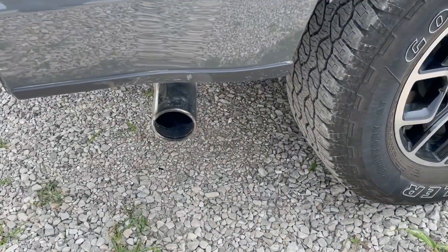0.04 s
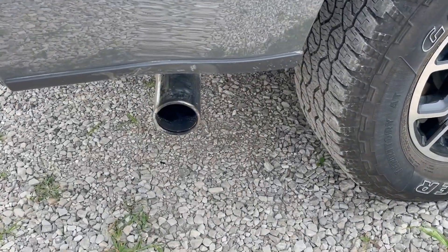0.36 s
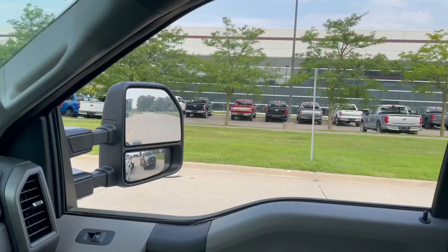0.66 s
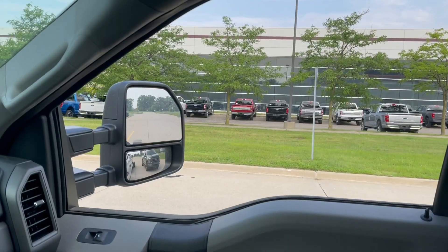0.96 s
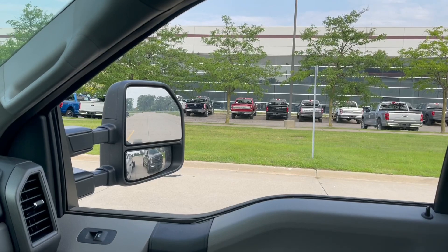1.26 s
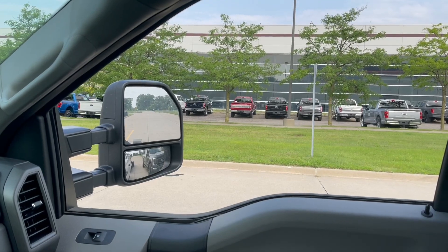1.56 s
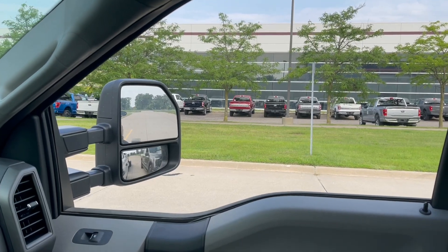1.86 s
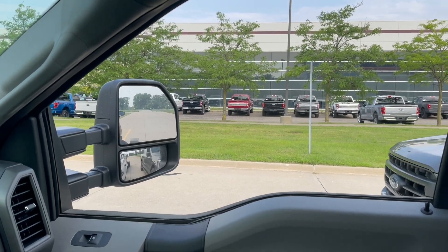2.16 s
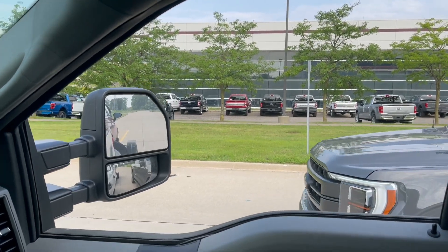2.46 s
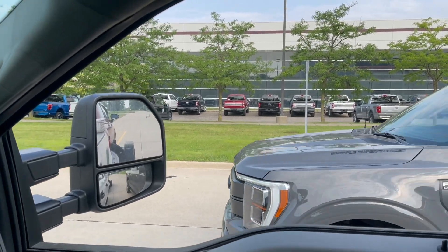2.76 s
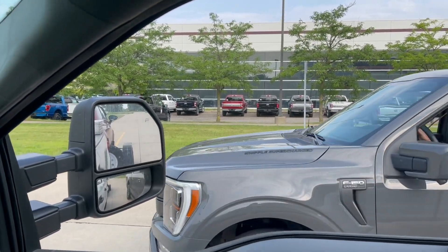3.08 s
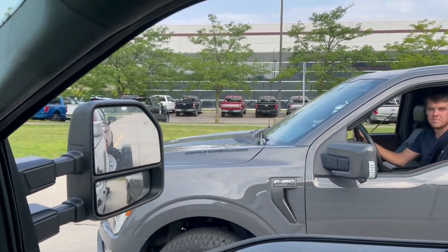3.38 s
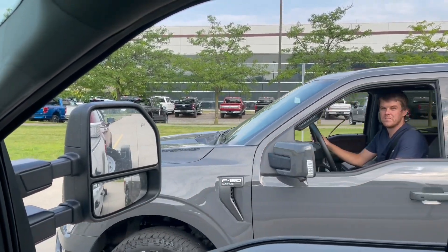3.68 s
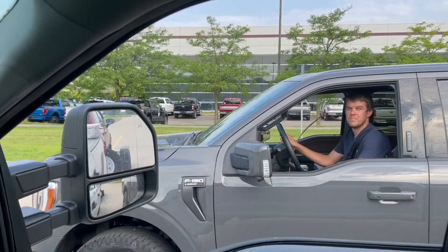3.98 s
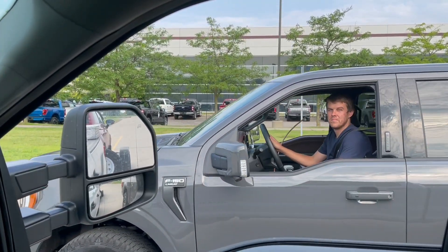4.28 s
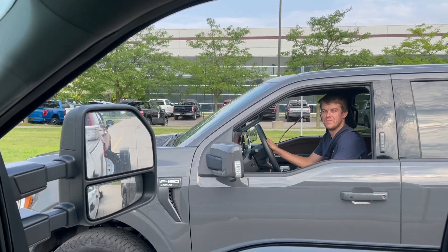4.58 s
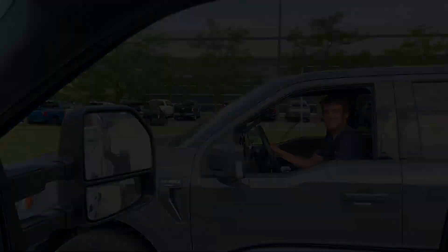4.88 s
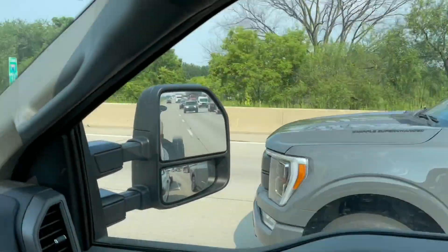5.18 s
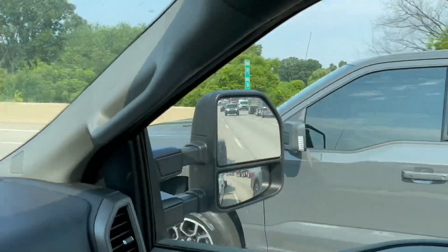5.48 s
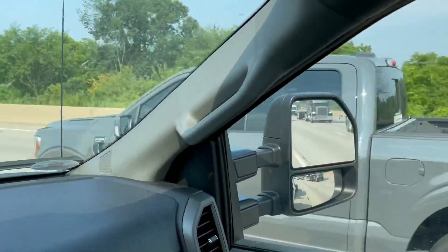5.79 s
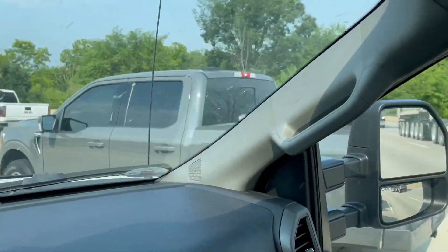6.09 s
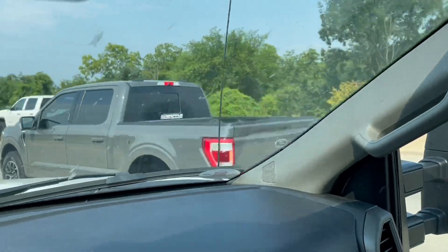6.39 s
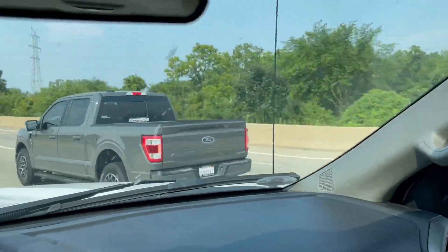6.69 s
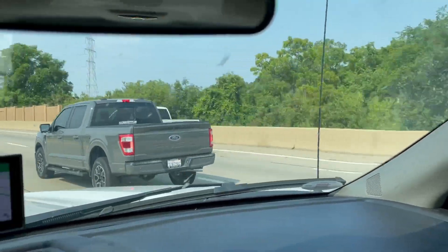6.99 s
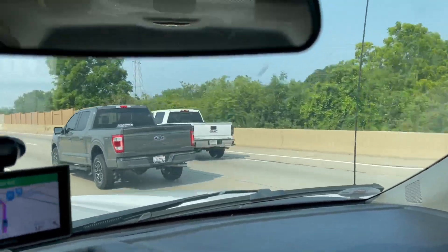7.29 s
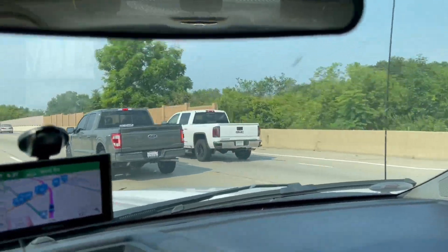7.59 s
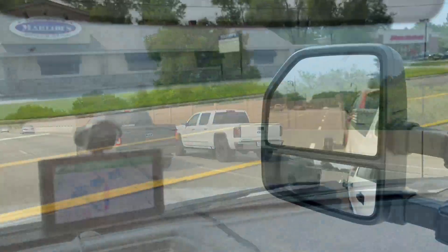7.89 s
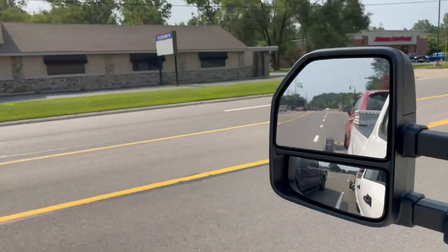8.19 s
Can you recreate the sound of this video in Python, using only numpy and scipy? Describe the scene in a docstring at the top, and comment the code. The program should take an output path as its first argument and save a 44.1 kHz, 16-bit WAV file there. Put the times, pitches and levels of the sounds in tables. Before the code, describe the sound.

A short exhaust burble cuts to soft cabin rumble, then booming highway noise with a passing V8 truck, slapping road joints and wind.

```python
"""Supercharged V8 pickup, four scenes.

Idle at the tailpipe: exhaust pulses puff gas noise. From a slow car's open window: the truck draws
alongside, engine running down, tyre, fan and supercharger swelling. Concrete highway: the truck
overtakes with a whine and an upshift while tyres slap over evenly spaced joints. Last, bright wind
rushes and buffets at an open window over a steady drivetrain."""
import sys
import numpy as np
from scipy.fft import rfft, irfft, next_fast_len
from scipy.io import wavfile
from scipy.ndimage import map_coordinates

SR = 44100
rng = np.random.default_rng(int(sys.argv[2]) if len(sys.argv) > 2 else 0)


def int16_out(signal):
    """Quantize to a 16-bit WAV file."""
    q = np.round(np.clip(np.atleast_2d(signal).T, -1, 1) * 32767)
    wavfile.write(sys.argv[1], SR, q.astype(np.int16))


N = 363825
IDLE_END_S = 0.599
HIGHWAY_START_S, HIGHWAY_FADE_S = 4.68, 0.52
WINDOW_START_S, WINDOW_FADE_S = 7.656, 0.54
SIDES = np.array([[1], [-1]])  # left, right

# Idle exhaust orders (crank multiple, level [dB])
IDLE_ORDERS = [(2.5, -28), (3.5, -31), (4, -37), (5, -25.5), (6, -39), (6.5, -36), (8, -39), (9.5, -43),
               (10, -40.5), (13, -38.5), (15, -43.5), (16, -61), (20, -43), (25, -43), (25.5, -45.5),
               (27, -50), (28, -49)]
# Noise spectra (frequency [Hz], relative density [dB])
TAILPIPE = [(80, -28), (130, -1), (190, -2.5), (240, -5.5), (350, -2), (450, -6.5), (520, -4), (620, -5),
            (700, -16), (820, -13), (1600, -39), (3000, -30), (5000, -49)]
EXHAUST_GAS = [(300, -2.5), (600, -6.5), (700, -13), (820, -6), (1460, -13), (2900, -17.5), (4500, -32.5),
               (5900, -24.5), (7500, -29), (9300, -24), (11200, -23.5), (12500, -53), (16000, -70)]
CABIN_RUMBLE = [(13, -42), (22, -11), (38, -5.5), (54, -2), (70, -3.5), (82, -5.5), (92, -4), (119, -4.5),
                (146, -15), (200, -25.5), (260, -56), (440, -120)]
SLOW_TYRES = [(110, -28), (165, -6), (213, -4), (264, -4), (318, -8.5), (457, -8.5), (541, -10.5),
              (652, -12.5), (725, -22), (785, -18.5), (1500, -21.5), (1950, -55), (3300, -120)]
FAN = [(100, -60), (300, -17), (390, -1.5), (470, -3.5), (600, -28), (1200, -70)]
ENGINE_BAY = [(820, 0), (1400, -7.5), (1530, -3.5), (1800, -1.5), (1940, -3), (2130, -3), (2310, -4.5),
              (2390, -5), (3230, -10.5), (4090, -15.5), (6500, -19), (8450, -24), (14300, -120)]
INTAKE = [(3500, -22), (6000, 1), (7200, -0.5), (8700, 7.5), (10200, 11), (11300, 3), (12000, -51),
          (15000, -45)]
FLOOR_BOOM = [(13, -42), (22, -18), (48, 3.5), (75, -1.5), (97, -0.5), (140, -2.5), (177, -8.5), (240, -7),
              (288, -18), (330, -16), (430, -37), (730, -120)]
TYRE_ROAR = [(160, -38), (280, -1), (381, 0), (416, -1.5), (534, -1.5), (660, -4.5), (763, -6.5),
             (873, -6.5), (1070, -12.5), (1540, -20.5), (2800, -32.5), (3640, -57), (6160, -120)]
AIR_HISS = [(1400, -4.5), (2400, -1.5), (3300, -2.5), (4400, -9.5), (6000, -9), (8900, -15), (10200, -11.5),
            (11300, -18.5), (12000, -49), (15000, -57)]
WIND = [(160, -38), (280, -24), (350, -3.5), (444, -2.5), (680, -4), (780, -1.5), (1050, -4.5), (1450, -12),
        (1800, -11.5), (2250, -11.5), (2900, -18), (5300, -27.5), (7280, -28), (8670, -21), (11300, -27),
        (12500, -31), (16000, -54)]
BUFFET = [(12, -37), (20, 1.5), (75, 2), (165, -2.5), (188, -8.5), (221, -5.5), (320, -14.5), (420, -48),
          (700, -120)]
# Left-right coherence per scene (frequency [Hz], coherence [0..1])
IDLE_COHERENCE = [(60, 0.23), (500, 0.18), (1300, 0.78), (2400, 0.93), (4200, 1)]
SLOW_COHERENCE = [(60, 1), (270, 0.91), (600, 0.66), (1100, 0.4), (2700, 0.31), (5000, .48), (7200, 0.54),
                  (8600, 1), (11000, 1)]
FAST_COHERENCE = [(60, 0.96), (270, 0.79), (600, 0.52), (1400, 0.35), (2200, 0.83), (5000, 0.85),
                  (6000, 0.99), (8700, 1), (9500, 1)]
WIND_COHERENCE = [(60, 0.94), (270, 0.72), (600, 0.49), (1000, .5), (2200, 0.87), (3500, 0.45), (5300, .3),
                  (6500, .65), (8600, 0.84), (11000, 0.85)]
# Phase between microphone ports per scene (frequency [Hz], left lead [rad])
IDLE_PHASE = [(500, 0), (1400, -1), (2000, 0), (3200, .35), (4200, 0)]
SLOW_PHASE = [(200, 0), (1000, .6), (1750, -.8), (2900, 1.1), (4000, .4), (6900, .1), (7600, .9), (8500, 0)]
FAST_PHASE = [(300, 0), (1000, .7), (1600, -.9), (3000, .7), (5200, .6), (5800, 0)]
WIND_PHASE = [(150, 0), (600, 1.3), (1120, 1.5), (1500, 2.7), (1900, 5.5), (2300, 6.2), (2930, 7.9),
              (4050, 6.6), (7600, 7), (8500, 2 * np.pi)]
# Balance per scene (frequency [Hz], left over right [dB])
SLOW_PAN = [(50, 3), (150, -0.5), (350, 4), (860, 3.5), (2080, 0.5), (5040, 4), (12200, -1)]
FAST_PAN = [(60, 0.5), (150, 2), (350, 2), (860, 2), (2080, 0.5), (5040, 1.0), (12200, -1)]
WIND_PAN = [(60, 3.5), (150, -1), (350, 3), (860, 4.5), (2080, -0.5), (5040, 2.5), (12200, -1)]
# Ticks, scuffs; suspension bumps (time [s], level [dB], centre [Hz], half-length [s], width [octaves])
TICKS = [(.5137, -36, 5860, .001, 0.34), (.5172, -32.5, 5700, .0011, 0.31), (1.86, -57, 8500, .012, .4),
         (3.611, -55.5, 3150, 0.088, .12), (3.676, -46.5, 2600, 0.024, 1.7), (3.674, -48, 9250, 0.021, .25),
         (3.96, -58, 10900, 0.088, 0.059), (5.79, -48, 10000, 0.008, 0.14), (5.85, -55, 9500, .02, 0.22),
         (6.256, -51.5, 7550, 0.012, 0.65), (7.278, -55, 8615, 0.008, 0.33)]
BUMPS = [(6.637, -22.5, 250, 0.0097, 0.24), (7.145, -17, 265, 0.011, 0.24), (7.568, -23, 192, 0.0099, 0.35),
         (7.735, -21, 253, .009, .25)]
# Slow car's engine and gears (time [s], frequency [Hz], level [dB])
CAR_DRONE = [(.6, 69, -28.5), (.8, 67, -36), (.95, 64.5, -28), (1.2, 70.5, -33.5), (1.8, 69.5, -37.5),
             (2.6, 70.3, -37), (4.65, 69.2, -35)]
GEAR_WHINE = [(.6, 652, -57.5), (1.25, 650, -54.5), (1.6, 655, -58), (1.8, 664, -50.5), (2.3, 653, -53.5),
              (2.7, 617, -59), (3.1, 600, -72)]
# Truck running down, one downshift (time [s], crank [Hz], lower order [dB], upper order [dB])
RUN_DOWN = [(.7, 27.6, -60, -71), (1.2, 23.4, -64, -75), (1.7, 22.5, -44.5, -60), (1.95, 21, -44, -43),
            (2.13, 21, -34.5, -39.5), (2.27, 19.5, -50, -33), (2.42, 18.6, -39.5, -39.5),
            (2.57, 16.7, -46, -43), (2.73, 18.1, -41.5, -50), (2.87, 18.6, -46, -40),
            (3.25, 18.3, -48.5, -45.5), (4.6, 18, -49, -47.5)]
# Supercharger housing resonances (frequency [Hz], half-width [Hz], level [dB])
HOUSING_MODES = [(1987, 38, -1), (2240, 50, -1), (2360, 35, -11), (2820, 29, -9), (3240, 170, -7.5)]
# Belt tones (frequency [Hz], level [dB])
BELT_WHINE = [(1999, -56), (3210, -66)]
# Front-end rattles (time [s], level [dB])
RATTLES = [(3.311, -46.5), (3.546, -46), (3.657, -40)]
# Loose metal's modes (frequency [Hz], level [dB])
RATTLE_MODES = [(1560, 1), (1950, 8), (2250, -9), (2550, -4), (2850, 0), (3130, -7), (3290, 0), (3430, -1)]
# Highway cabin drones (time [s], lower [dB], upper [dB])
CABIN_DRONES = [(5.0, -26, -39), (5.3, -28, -31), (5.55, -23, -21), (5.72, -29, -20), (5.9, -40, -14.5),
                (6.15, -17, -25), (6.37, -19.5, -34), (6.53, -26, -15), (6.72, -18, -19.5),
                (6.951, -24, -25.5), (7.25, -19, -18.5), (7.7, -25, -23)]
# Truck pulling, one upshift (time [s], crank [Hz], throb [dB], snarl [dB])
PULL = [(4.8, 58.32, -19, -24), (5.05, 58.95, -26, -19), (5.22, 59.74, -20.5, -18),
        (5.48, 60.36, -16, -21.5), (5.65, 61.44, -17, -25.5), (5.83, 61.55, -25, -24),
        (5.96, 58.1, -32, -15.5), (6.08, 53.55, -35, -21), (6.35, 52.26, -33, -24), (6.6, 52.3, -31, -37),
        (7.6, 53.2, -33, -36)]
# Exhaust snarl (crank multiple, level [dB])
SNARL_ORDERS = [(2.5, -1), (3.5, -13), (4, -11), (5.5, -20)]
# Supercharger partials, the higher beaming more narrowly (harmonic, level [dB], beam half-width [s])
BLOWER_PARTIALS = [(1, -32, 0.14), (5, -50.5, 0.089)]
# Cabin trim modes (frequency [Hz], level [dB], t60 [s])
TRIM_MODES = [(102.5, 3, 0.053), (284, -5, 0.048), (632, -12.5, 0.078), (950, -4.5, 0.02),
              (1560, -13, 0.015)]
# Road joints (time [s], front axle [dB], front note [Hz], rear axle [dB])
JOINTS = [(4.865, -24, 810, -22), (5.117, -15.5, 823, -13), (5.375, -15.5, 704, -17),
          (5.630, -15.5, 818, -18.5), (5.888, -15, 680, -21), (6.396, -18.5, 709, -24.5),
          (6.651, -16.5, 768, -21), (6.908, -19, 640, -18.5), (7.166, -5.5, 601, -19),
          (7.413, -9, 625, -23), (7.672, -10, 610, -29.5)]
# Drivetrain tones (frequency [Hz], level re wind [dB])
DRIVETRAIN = [(62.4, -4), (447, -9), (510, -20), (550, -15.5), (741, -15), (1068, -15), (2190, -19)]
# Microphone ports in the high treble (frequency [Hz], left lag [rad])
PORT_LAG = [(8800, 0), (10250, np.pi), (11700, 2 * np.pi)]


def amp(db):
    """Decibels to gain."""
    return 10 ** (np.asarray(db) / 20)


def unit(x):
    """Scale to rms 1."""
    return x / np.sqrt(np.mean(x ** 2) + 1e-20)


def clock():
    """Sample times in seconds."""
    return np.arange(N) / SR


def along(points, hz):
    """Interpolate (frequency [Hz], value) on a log axis."""
    knots_hz, values = np.transpose(points)
    return np.interp(np.log(hz + 1), np.log(knots_hz + 1), values)


def curves(rows):
    """Per-sample curve for each column after the time."""
    times_s, *columns = np.transpose(rows)
    return [np.interp(clock(), times_s, column) for column in columns]


def rise(start_s, length_s):
    """Ramp from 0 to 1."""
    return np.clip((clock() - start_s) / length_s, 0, 1)


def passing(at_s, near_s):
    """1 / distance swell: 1 at at_s, -3 dB near_s either side."""
    return 1 / np.hypot(1, (clock() - at_s) / near_s)


def wobble(rate_hz):
    """Smooth random curve."""
    return map_coordinates(rng.standard_normal(int(N * rate_hz / SR) + 4), [clock() * rate_hz])


def filtered(x, response):
    """Apply a frequency response."""
    size = next_fast_len(N + SR // 4)
    return irfft(rfft(x, size) * response(np.fft.rfftfreq(size, 1 / SR)), size)[..., :N]


def noise_band(size, centre_hz, octaves):
    """Noise in a log-Gaussian band, rms 1."""
    hz = np.fft.rfftfreq(size, 1 / SR) + 1
    band = np.exp(-0.5 * (np.log2(hz / centre_hz) / octaves) ** 2)
    return unit(irfft(rfft(rng.standard_normal(size)) * band, size))


def rush(spectrum, coherence, phase, pan, flutter_db, flutter_hz=20,
         ripple_db=1.7, ripple_step_hz=45, ripple_from_hz=300):
    """Fluttering noise at two microphone ports, mid rms 1; glass and body reflections ripple it."""
    size = next_fast_len(N)
    hz = np.fft.rfftfreq(size, 1 / SR)
    mix_rad = np.arccos(np.clip(along(coherence, hz), 0, 1)) / 2
    ports = amp(SIDES * along(pan, hz) / 2) * np.exp(1j * SIDES * along(phase, hz) / 2)
    near, diffuse = ports * np.cos(mix_rad), ports * SIDES * np.sin(mix_rad)
    mid = np.hypot(abs(near.mean(axis=0)), abs(diffuse.mean(axis=0)))
    ripple = map_coordinates(rng.standard_normal(SR // 10), [hz / ripple_step_hz])
    shape_db = along(spectrum, hz) + ripple_db * ripple * hz / (hz + ripple_from_hz)
    shared, apart = rfft(rng.standard_normal((2, size))) * amp(shape_db) / mid
    pair = irfft(shared * near + apart * diffuse, size)[:, :N] * amp(flutter_db * wobble(flutter_hz))
    return pair / np.std(pair.mean(axis=0))


def tone(hz, waver, rough_db, orders=((1, 0),)):
    """Tone with orders (multiple, level [dB]); pitch wanders by the fraction waver."""
    angle = 2 * np.pi * np.cumsum(hz * (1 + waver * wobble(25))) / SR
    gain = amp(rough_db * wobble(18))
    return gain * sum(amp(db) * np.sin(k * angle + 2 * np.pi * rng.random()) for k, db in orders)


def idle(crank_hz=20.24, beat_at_s=0.0235, lope_db=1.7, max_locked_order=5, pipe_db=-35, gas_db=-38,
         shield_hz=1691, shield_db=-46):
    """Exhaust lopes every two crank turns; pressure peaks puff gas; thin metal rings up briefly."""
    turns = np.cumsum(crank_hz * (1 + 0.0023 * wobble(5.9))) / SR - crank_hz * beat_at_s
    burble = np.zeros(N)
    for order, db in IDLE_ORDERS:
        gain = np.sqrt(2) * amp(db + lope_db * wobble(20.1))
        offset = (order > max_locked_order) * rng.random()  # low orders peak together
        burble += gain * np.cos(2 * np.pi * (order * turns + offset))
    pressure = unit(burble)
    puffs = np.exp(0.24 * pressure) * rng.standard_normal(N)
    pipe = unit(filtered(puffs, lambda hz: amp(along(TAILPIPE, hz))))
    gas = rush(EXHAUST_GAS, IDLE_COHERENCE, IDLE_PHASE, pan=[(1000, 0)], flutter_db=0.5)
    gas *= 1 + 0.12 * pressure
    shield = passing(at_s=0.52, near_s=0.035) * tone(shield_hz, waver=0.0022, rough_db=0)
    return burble + amp(pipe_db) * pipe + amp(gas_db) * gas + amp(shield_db) * shield


def contacts(rows):
    """Brief contacts, each a burst of band noise."""
    out, size = np.zeros(N), SR // 2
    t = (np.arange(size) - size // 2) / SR
    for at_s, db, hz, half_s, octaves in rows:
        burst = amp(db) * noise_band(size, hz, octaves) * np.exp(-(t / half_s) ** 2)
        out[round(at_s * SR) - size // 2:][:size] += burst
    return out


def slow_car(rumble_db=-37, tyre_db=-45):
    """Car rolling gently: cabin rumble, tyres, engine drone from the left, faint gear whine."""
    ports = SLOW_COHERENCE, SLOW_PHASE, SLOW_PAN
    rumble = amp(rumble_db) * rush(CABIN_RUMBLE, *ports, flutter_db=-1, flutter_hz=11)
    tyres = amp(tyre_db) * rush(SLOW_TYRES, *ports, flutter_db=0)
    drone_hz, drone_db = curves(CAR_DRONE)
    drone = amp(drone_db) * tone(drone_hz, waver=0.011, rough_db=-0.9, orders=[(1, -0.5), (2, -20)])
    gear_hz, gear_db = curves(GEAR_WHINE)
    gears = amp(gear_db) * tone(gear_hz, waver=0.006, rough_db=-1.5) * (0.81 + 0.4 * wobble(45))
    return rumble + tyres + drone * amp(2 * SIDES) + gears


def truck_alongside(orders=(12, 14), fan_db=-48, tyre_db=-44, bay_at_s=3.86, bay_db=-53,
                    intake_db=-57, rasp_db=-56):
    """Engine runs down; tyre, fan, intake, supercharger and belt swell as each draws level."""
    ports = SLOW_COHERENCE, SLOW_PHASE, SLOW_PAN
    crank_hz, *levels_db = curves(RUN_DOWN)
    engine = sum(amp(db) * tone(k * crank_hz, waver=0.0025, rough_db=0.5)
                 for k, db in zip(orders, levels_db))
    engine *= 1 + 0.13 * (1 + 4 * rise(2.15, 0.52)) * wobble(75)  # uneven firing near idle
    fan = amp(fan_db) * passing(at_s=3.8, near_s=0.5) * rush(FAN, *ports, flutter_db=2.5)
    tyre = amp(tyre_db) * passing(at_s=2.7, near_s=0.6) * rush(SLOW_TYRES, *ports, flutter_db=2)
    near = passing(bay_at_s, near_s=1.09)
    bay = amp(bay_db + 2 * near) * rush(ENGINE_BAY, *ports, flutter_db=1.1)
    intake = amp(intake_db) * near * rush(INTAKE, *ports, flutter_db=1.5)
    housing = lambda f: sum(amp(db) / (1 + ((f - hz) / width) ** 2) for hz, width, db in HOUSING_MODES)
    rasp = amp(rasp_db + 1.4 * wobble(18)) * passing(bay_at_s, near_s=0.41)
    rasp *= unit(filtered(rng.standard_normal(N), housing))
    belt = sum(amp(db) * tone(hz, waver=0.00303, rough_db=2) for hz, db in BELT_WHINE)
    belt *= passing(at_s=4.77, near_s=0.3)
    belt *= 1.13 + 0.56 * wobble(70)  # intake turbulence
    return tyre + fan + bay + intake + (engine + rasp + belt) * amp(0.8 * SIDES)


def rattles(t60_s=0.15, attack_s=0.0048, detune=0.0096):
    """Loose front-end metal chinks as the truck brakes."""
    out, t = np.zeros(N), clock()[:SR // 4]
    for at_s, db in RATTLES:
        ring = np.zeros(len(t))
        for hz, mode_db in RATTLE_MODES:
            gain = amp(mode_db + rng.normal(0, 3))
            ring += gain * np.sin(2 * np.pi * hz * rng.normal(1, detune) * t)
        ring *= 0.5 + 0.45 * wobble(490)[:len(t)]  # parts chatter together
        out[round(at_s * SR):][:len(t)] += amp(db - 60 * t / t60_s) * (1 - np.exp(-t / attack_s)) * ring
    return out


def highway(boom_db=-18.5, boom_db_per_s=0.8, roar_db=-28.5, air_db=-52, drones_hz=(60.7, 105.2),
            tread_hz=381, tread_db=-40):
    """Concrete booms ever louder through the floor; tyre roar, air on glass, drones, tread hum."""
    ports = FAST_COHERENCE, FAST_PHASE, FAST_PAN
    boom = amp(boom_db + boom_db_per_s * (clock() - 6)) * rush(FLOOR_BOOM, *ports, flutter_db=0.73)
    roar = amp(roar_db) * rush(TYRE_ROAR, *ports, flutter_db=1.36, flutter_hz=45)
    air = amp(air_db) * rush(AIR_HISS, *ports, flutter_db=0.55)
    drones = sum(amp(db) * tone(hz, waver=0.0097, rough_db=2.2)
                 for hz, db in zip(drones_hz, curves(CABIN_DRONES)))
    tread = amp(tread_db) * tone(tread_hz, waver=0.00516, rough_db=2)
    return boom + roar + air + drones + tread


def truck_overtaking(throb_order=1.5, blower_order=11.1, grille_at_s=5.27, tail_at_s=5.88, wash_db=-47):
    """Crank drives exhaust and a forward-beaming supercharger; air hisses between the two bodies."""
    crank_hz, throb_db, snarl_db = curves(PULL)
    throb = amp(throb_db) * tone(throb_order * crank_hz, waver=0.0036, rough_db=-0.8)
    snarl = amp(snarl_db) * tone(crank_hz, waver=0.003, rough_db=-0.2, orders=SNARL_ORDERS)
    wash = amp(wash_db) * rush(AIR_HISS, FAST_COHERENCE, FAST_PHASE, FAST_PAN, flutter_db=0)
    wash *= 1 - rise(tail_at_s, 0.9)
    whine = np.zeros(N)
    for harmonic, db, beam_s in BLOWER_PARTIALS:
        partial = tone(harmonic * blower_order * crank_hz, waver=0.0021, rough_db=1)
        whine += amp(db) * passing(grille_at_s, beam_s) * partial
    whine *= 1 + 0.4 * wobble(130)
    whine *= rise(HIGHWAY_START_S, 0.088) * (1 - rise(grille_at_s, 0.15))
    pan = amp(0.8 * SIDES)
    return (wash + pan * (throb + snarl)) * rise(HIGHWAY_START_S, HIGHWAY_FADE_S) + pan * whine


def cabin_knock(at_s=4.7012, gain_db=-13, attack_s=0.0043, crack_db=-23, crack_t60_s=0.017):
    """Dull knock: a tiny crack, then the trim rings."""
    t = np.maximum(clock() - at_s, 0)
    ring = sum(amp(db - 60 * t / t60_s) * np.sin(2 * np.pi * hz * t) for hz, db, t60_s in TRIM_MODES)
    ring *= 1 - np.exp(-t / attack_s)
    crack = (t > 0) * amp(crack_db - 60 * t / crack_t60_s) * rng.standard_normal(N)
    return amp(gain_db) * (crack - 1.75 * ring)


def joint_slaps(swell_s=0.0037, fade_s=0.0078, rear_lag_s=0.152, rear_hz=660, wheel_lag_s=0.0123,
                thud_hz=260, thud_db=-12, note_db=-7, rasp_db=-7):
    """Each joint thuds the tyre and squeezes a hollow note from the tread; front axle, then rear."""
    out, size = np.zeros(N), SR // 5
    t = (np.arange(size) - size // 2) / SR
    envelope = np.exp(np.minimum(t / swell_s, -t / fade_s))
    thud = amp(thud_db) * np.sin(2 * np.pi * thud_hz * t)
    front = [(at_s, db, hz) for at_s, db, hz, _ in JOINTS]
    rear = [(at_s + rear_lag_s, db, rear_hz) for at_s, _, _, db in JOINTS]
    for at_s, db, axle_hz in front + rear:
        # second wheel: later, softer, lower
        for lag_s, wheel_db, hz in [(0, 0, axle_hz), (wheel_lag_s, -6, 0.855 * axle_hz)]:
            note = amp(note_db) * np.sin(2 * np.pi * (hz * t + rng.random()))
            rasp = amp(rasp_db) * noise_band(size, hz, octaves=0.29)
            slap = amp(db + wheel_db) * envelope * (note + rasp + thud)
            out[round((at_s + lag_s) * SR) - size // 2:][:size] += slap
    return out * amp(SIDES)


def open_window(gain_db=-20, buffet_db=5, waver=0.0031):
    """Wind rushes and buffets at the window over the steady drivetrain."""
    ports = WIND_COHERENCE, WIND_PHASE, WIND_PAN
    wind = rush(WIND, *ports, flutter_db=0.45)
    buffet = amp(buffet_db) * rush(BUFFET, *ports, flutter_db=1.5)
    drivetrain = sum(amp(db) * np.sin(2 * np.pi * hz * np.cumsum(1 + waver * wobble(22)) / SR)
                     for hz, db in DRIVETRAIN)
    return amp(gain_db) * (wind + buffet + drivetrain)


def scene():
    """Idle stops short; the other three scenes crossfade; short events on top."""
    parked = idle() * (1 - rise(IDLE_END_S, 0.0012))
    slow = (slow_car() + truck_alongside()) * rise(IDLE_END_S + 0.0041, 0.018)
    slow *= 1 - rise(HIGHWAY_START_S, 0.4)
    fast = highway() * rise(HIGHWAY_START_S, HIGHWAY_FADE_S) + truck_overtaking()
    fast *= 1 - rise(WINDOW_START_S, 0.44)
    windy = open_window() * rise(WINDOW_START_S, WINDOW_FADE_S)
    events = joint_slaps() + cabin_knock() + rattles() + contacts(TICKS) + contacts(BUMPS)
    return parked + slow + fast + windy + events


def record(dry, port_hz=10200, half_width_hz=550, port_db=3, cutoff_hz=12600):
    """Two microphone ports resonate and swing through antiphase in the high treble; steep low-pass."""
    def response(hz):
        resonance = amp(port_db / (1 + ((hz - port_hz) / half_width_hz) ** 2))
        left_lag = np.exp(-1j * np.array([[1], [0]]) * along(PORT_LAG, hz))
        return resonance * left_lag / np.sqrt(1 + (hz / cutoff_hz) ** 80)
    return filtered(dry, response)


dry = scene()
out = record(dry)
int16_out(out)
```